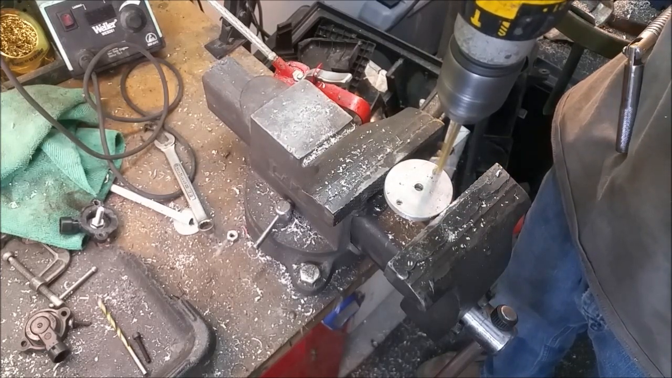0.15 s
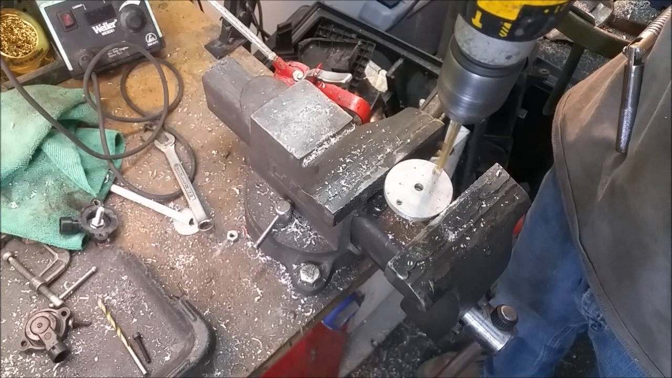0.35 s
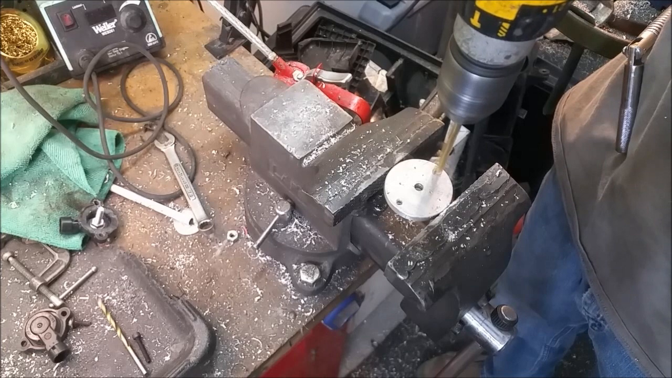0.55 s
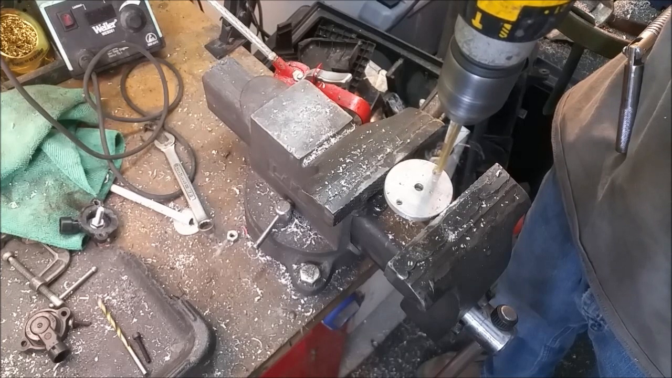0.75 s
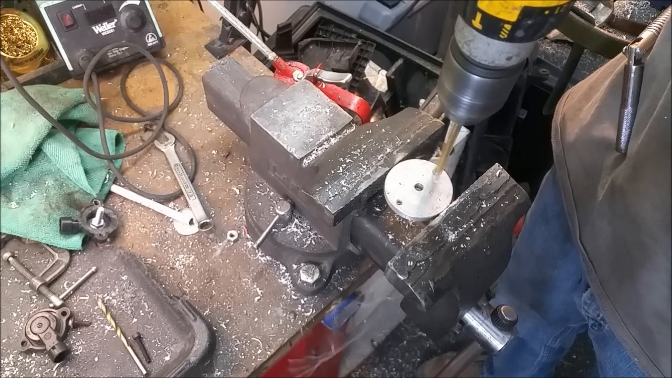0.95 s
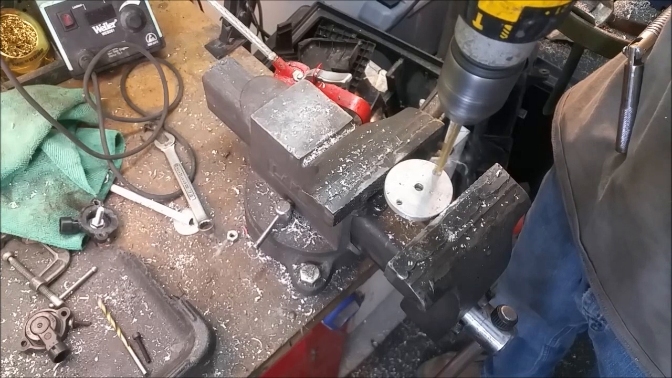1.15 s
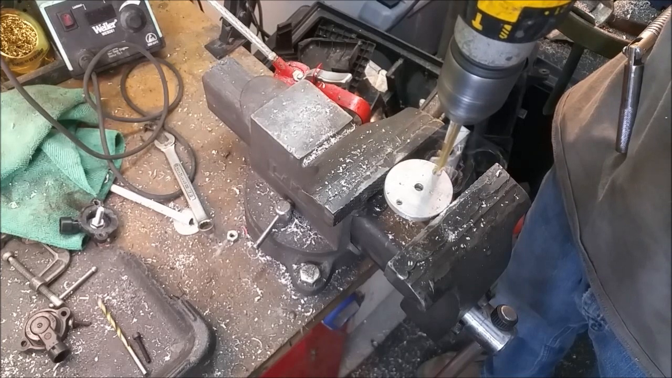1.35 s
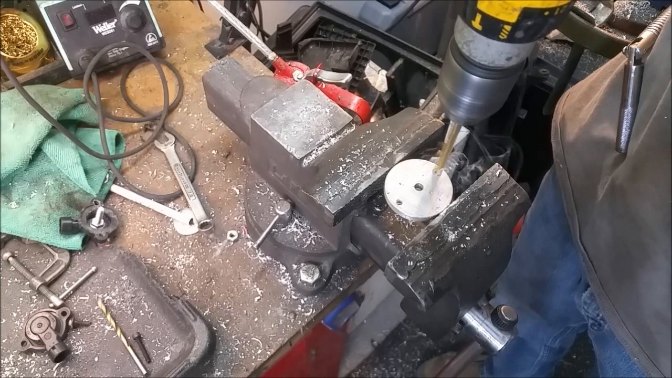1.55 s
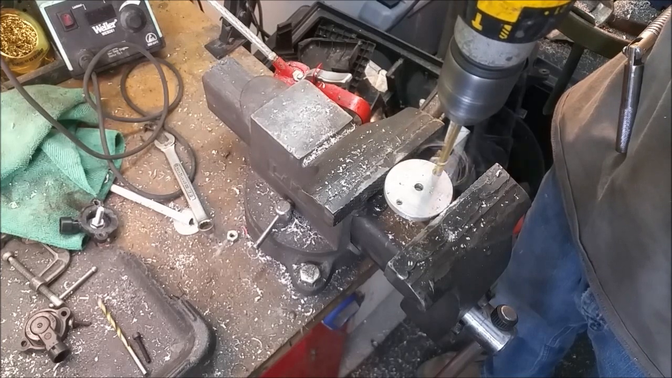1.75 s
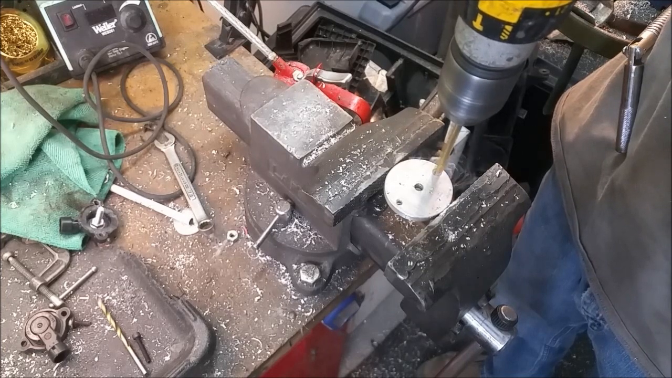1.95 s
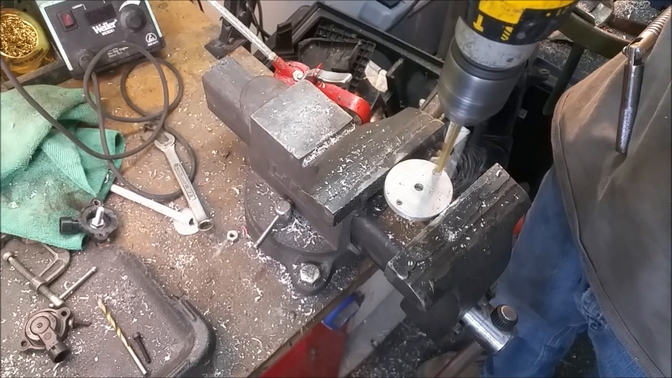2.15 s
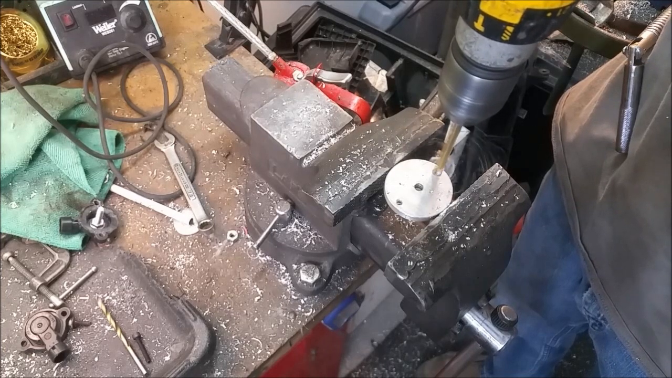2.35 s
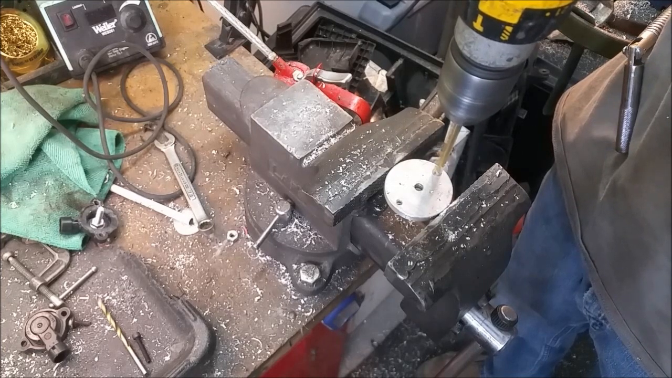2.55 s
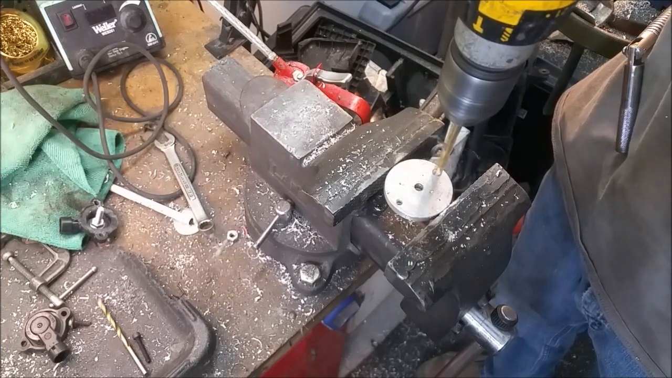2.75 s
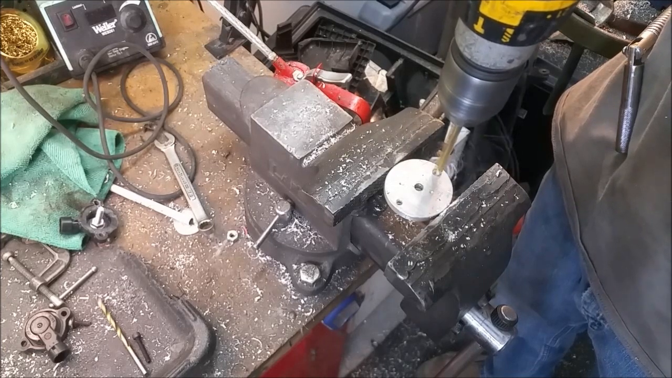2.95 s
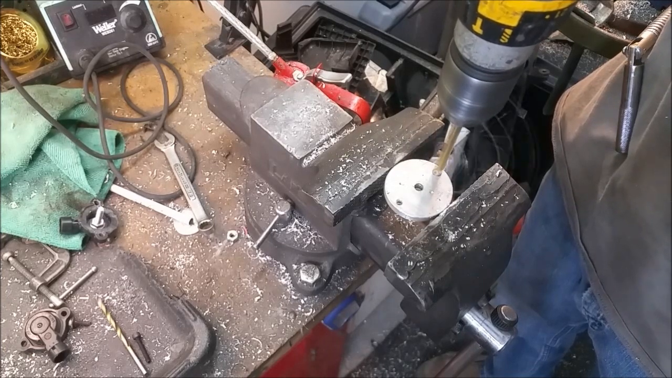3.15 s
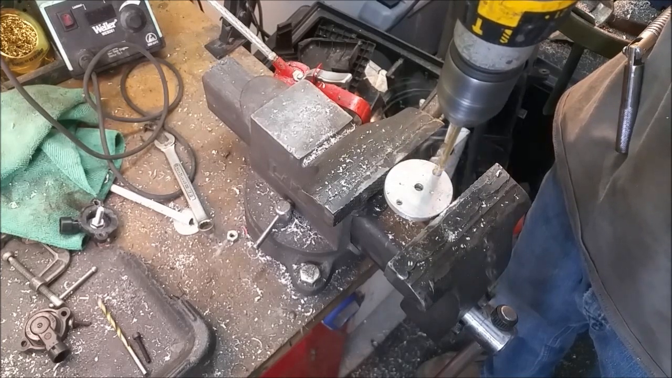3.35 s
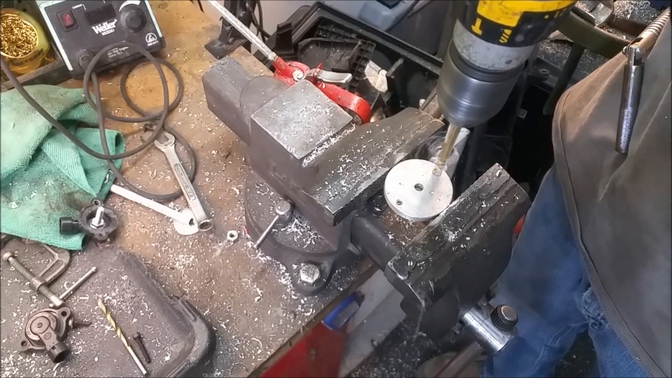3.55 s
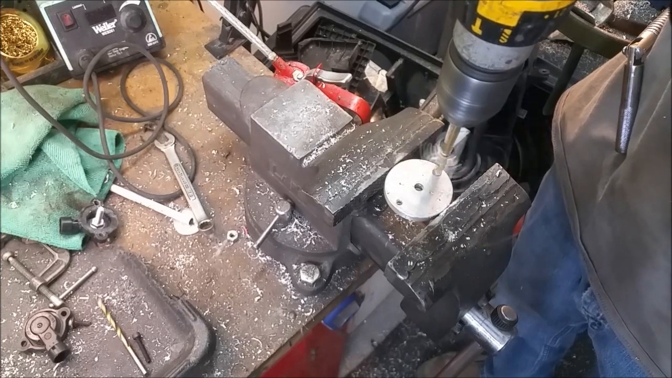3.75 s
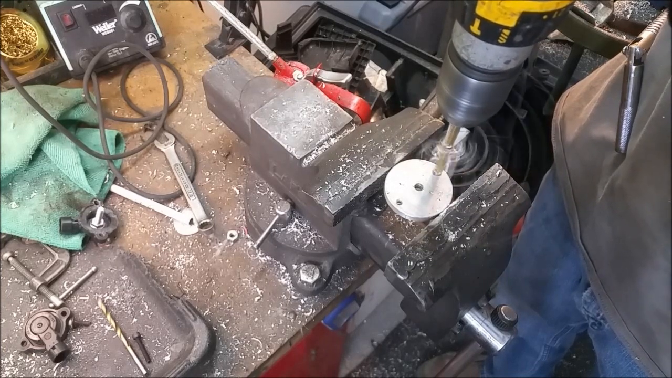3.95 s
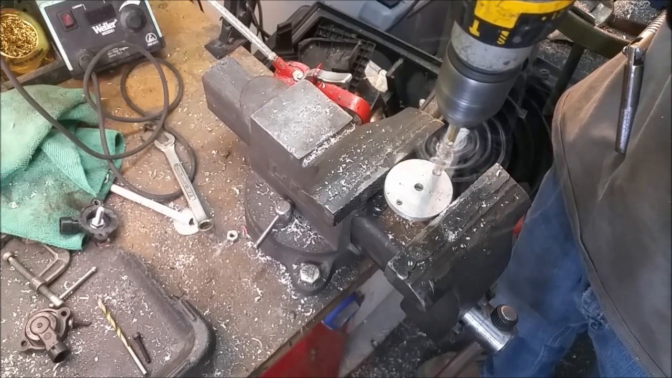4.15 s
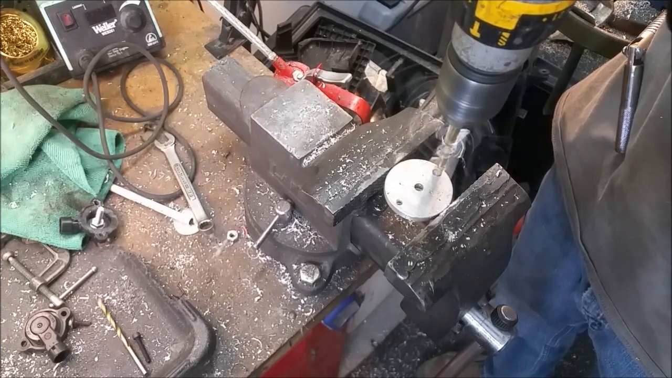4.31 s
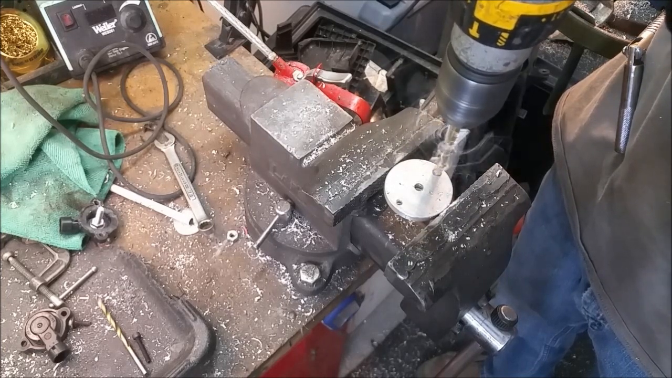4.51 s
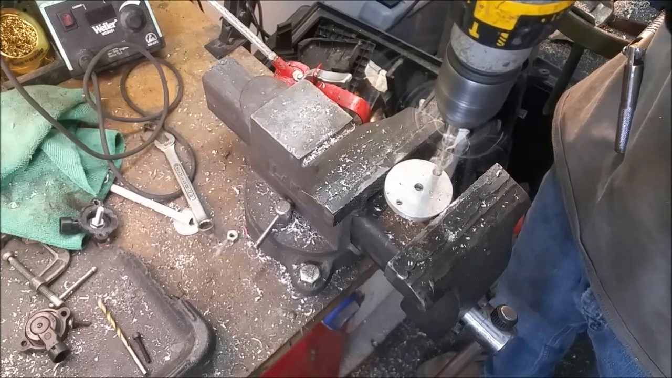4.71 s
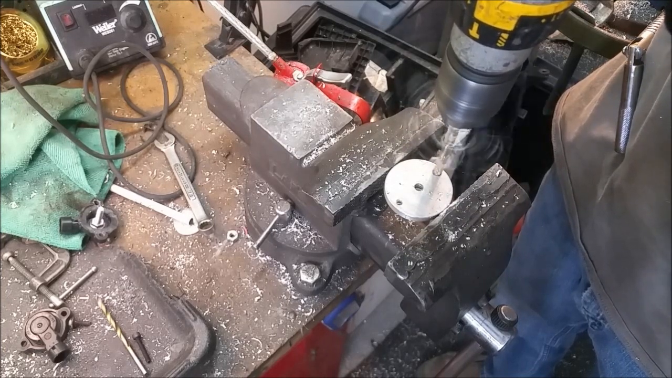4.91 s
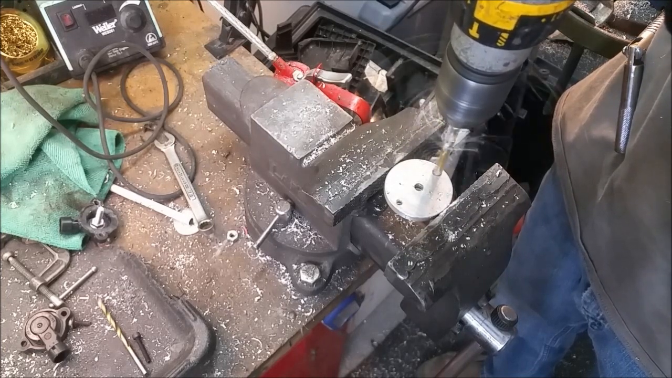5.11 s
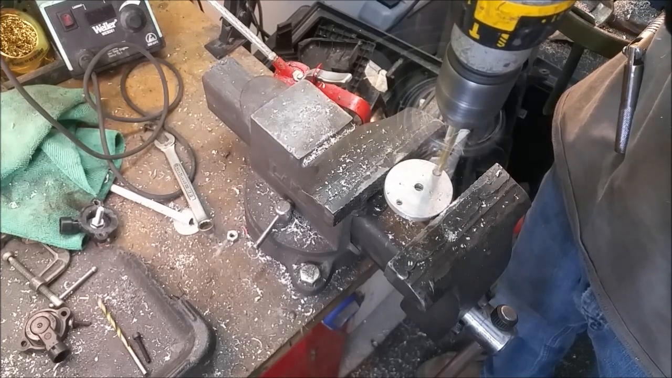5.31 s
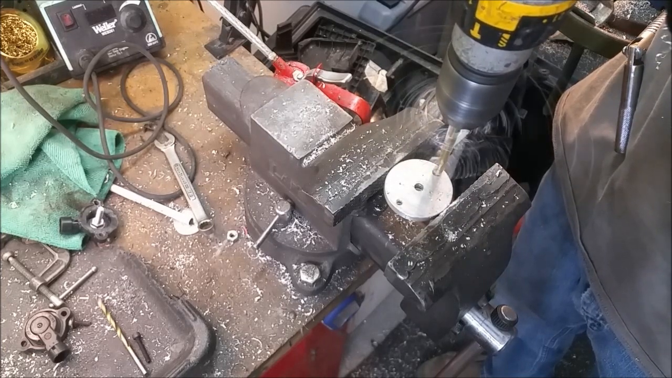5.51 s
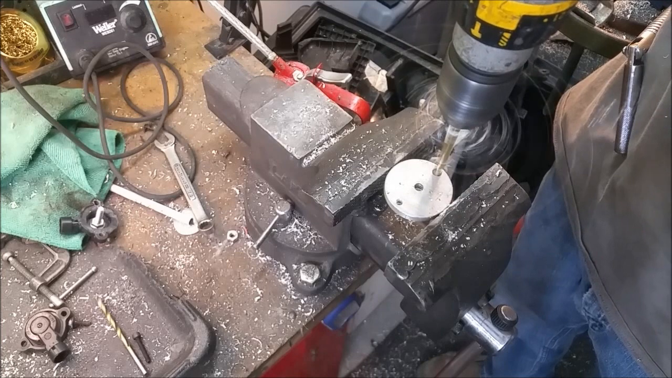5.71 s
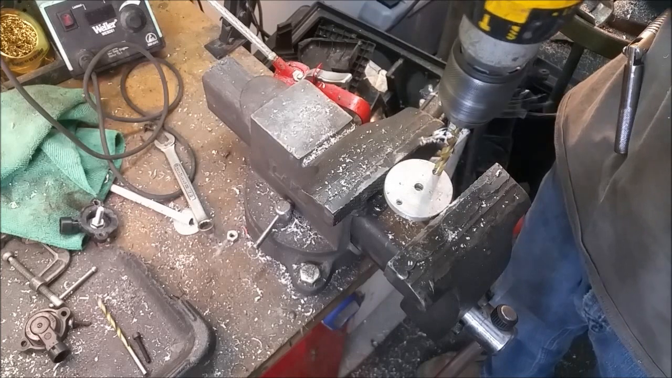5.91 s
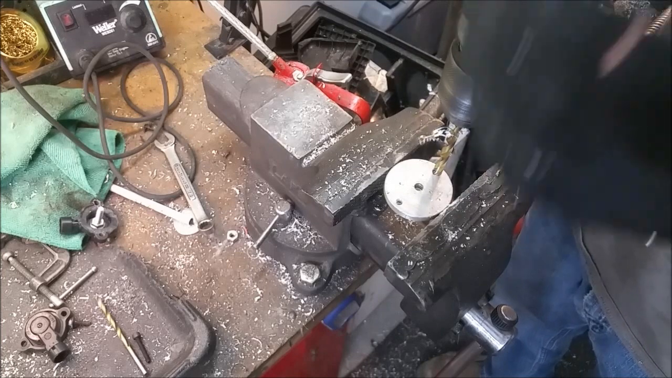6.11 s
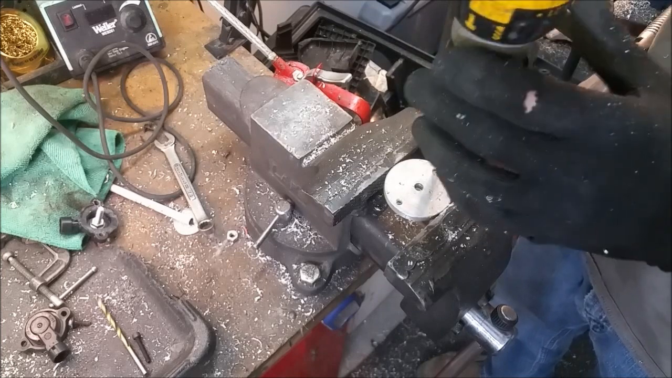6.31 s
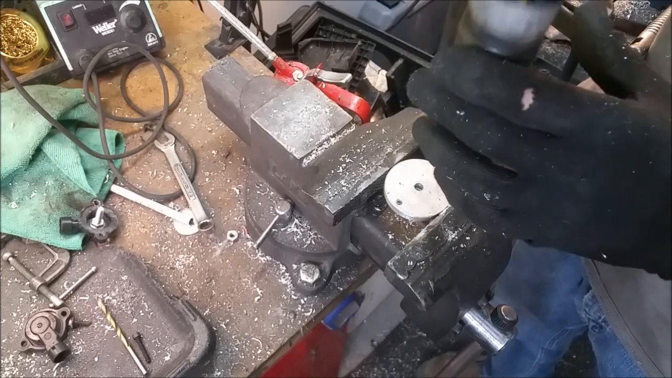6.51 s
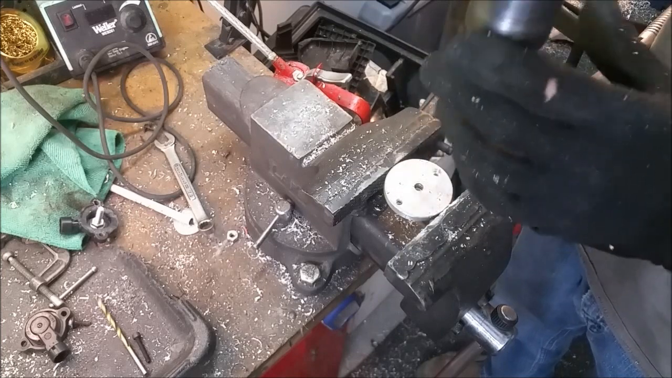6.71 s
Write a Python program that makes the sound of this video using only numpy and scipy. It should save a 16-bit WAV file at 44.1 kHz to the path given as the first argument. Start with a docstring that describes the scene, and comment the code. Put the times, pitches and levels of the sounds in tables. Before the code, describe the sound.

A cordless drill bores into aluminium with a loud, high, warbling squeal, then stops and is blipped once.

```python
"""A cordless drill's bit squeals as it bores a shallow recess in an aluminium disc in a vice.
The squeal is self-excited chatter, which warbles each time a cutting lip comes round. Chips scrape,
the gears whine, air from the motor fan buffets the left microphone, and a low hum swells at times.
The bit squeaks as it is pulled out; the drill brakes with a clack and is blipped once with no load.
The bench and the walls of the small workshop reflect the sound."""
import sys
import numpy as np
from scipy import signal
from scipy.io import wavfile

SR = 44100
rng = np.random.default_rng(int(sys.argv[2]) if len(sys.argv) > 2 else 0)


def unload_audio(sound):
    """Save the sound as a 16-bit wav file, at the path given as the first command line argument."""
    columns = np.transpose(np.atleast_2d(sound))
    # keep every value between -1 and 1, then stretch to whole-number steps
    steps = np.round(np.clip(columns, -1, 1) * 32767)
    wavfile.write(sys.argv[1], SR, steps.astype(np.int16))


N = 298557
TIME = np.arange(N) / SR

# passing frequency of the cutting lips: t/s, f/Hz
LIP_RATE = [(0, 16.679), (.4, 16.138), (.95, 16.219), (1.15, 15.754), (2.15, 15.944), (2.6, 15.414),
            (3, 15.654), (3.45, 15.409), (4.9, 15.669), (5.2, 15.406), (5.85, 16.049)]
# how hard the lips are pressed into the metal: t/s, load (0-1)
LOAD = [(0, 0.44), (1.2, 0.13), (2.1, 0.34), (2.5, 0.82), (3.7, 1), (5.7, 0.77), (5.83, 0)]
# squeal at the microphones: t/s, left minus right/dB, phase lead of the right/rad
SQUEAL_PAN = [(0, 0, 0.05), (1.8, 1, 0.18), (2.4, 1.5, 1), (3.8, 0.5, 0.78), (4.8, -1, 0.41),
              (5.8, -0.5, 0.042)]
# weaker ringing tones of bit and disc, plus a faint sum tone of the squeal and the 6.8 kHz ringing: f/Hz,
# width/Hz, level/dB early, midway and late in the cut, place in the pass (0-1), left minus right/dB
SIDE_TONES = [(2346, 220, -62.5, -49, -52, 0.91, 5.5), (3796, 130, -64, -43, -53, 0.16, -3),
              (3756, 130, -52, -45.5, -52.5, 0.73, -7), (4670, 210, -52.5, -57.5, -51, 0.12, -4.5),
              (6830, 180, -49.5, -49.5, -45, 0.1, -36), (11950, 70, -51, -65, -58.5, .95, -14),
              (12600, 320, -58.5, -56, -52, .05, -7.5)]
# spectrum of the scraping chips: f/Hz, relative level/dB
CHIP_SPECTRUM = [(150, -22.5), (400, -7.5), (700, -5.5), (1100, -5), (1600, 0), (2400, -1), (3100, 0.5),
                 (4000, -3.5), (5200, 8.5), (6400, -1.5), (8300, -16), (10500, -14), (14000, -10.5),
                 (16000, -27.5)]
# coherence of the drill's noise between the microphones: f/Hz, correlation
COHERENCE = [(100, 1), (640, 0.36), (1400, 0.36), (3100, .5), (6000, 0.4), (9000, -0.26), (15000, 0.4)]
# balance of the drill's noise: f/Hz, left minus right/dB
BALANCE = [(200, 10), (700, 1.5), (1300, 0.5), (2400, 3.5), (4400, 1), (6800, -3), (9000, 18.5),
           (12500, -13), (15000, 5.5)]
# motor and gear tones: multiple of the lip rate, relative level/dB at light and at heavy load
GEAR_TONES = [(40.14, -10, -11.5), (64.03, -4.5, -3), (79.8, -10.5, -7.5), (118.6, -9, -2.5),
              (144, -16.5, -5), (155.4, -4.5, -1.5), (162.9, -8, -6.5), (171.2, -12.5, 0.5)]
# spectrum of the fan's draught: f/Hz, relative level/dB
DRAUGHT_SPECTRUM = [(15, -43), (25, -12), (91, 3.5), (200, 0), (227, -1.5), (327, -6.5), (500, -6.5),
                    (650, -7), (1100, -120)]
# spectrum of the room's background noise: f/Hz, relative level/dB
HUSH_SPECTRUM = [(18, -26.5), (30, -2.5), (234, -8), (281, -15), (511, -17.5), (1870, -31), (2560, -28.5),
                 (15000, -43.5)]
# swells of low hum: peak t/s, half length/s, f/Hz, level/dB
HUMS = [(2.52, 0.43, 93.4, -59.5), (3.03, 0.42, 140, -60), (5.95, 0.18, 198, -73.5)]
# squeaks of the bit: t/s, length/s, start f/Hz, middle f/Hz, end f/Hz, level/dB
SQUEAKS = [(5.794, 0.01, 11200, 11300, 10980, -31), (5.83, .018, 11600, 11500, 12300, -34.5)]
# spectrum of the unloaded gears: f/Hz, relative level/dB
RATTLE_SPECTRUM = [(71, -73), (120, -30), (435, -15), (642, -17.5), (820, -6), (1190, -11), (1710, -1.5),
                   (2470, -13), (4040, -2.5), (10400, -19), (11500, -23), (13800, -12), (15900, -29.5)]
# impacts as the brake takes up the gear play: t/s, level/dB
CLACKS = [(5.847, -34), (5.926, -54), (6.576, -30), (6.603, -31.5), (6.614, -41), (6.677, -57)]
# whines of the speed control: t/s, length/s, start f/Hz, middle f/Hz, end f/Hz, level/dB
CONTROL_WHINES = [(6.272, .033, 4700, 4730, 4760, -71), (6.357, .021, 5080, 5050, 4950, -69),
                  (6.376, .062, 4080, 3690, 4500, -46.5)]

SINK_FROM_S, SINK_TO_S, STOP_S = 1.8, 4.5, 5.844  # the bit sinks steadily between the first two
DIG_PLACE, SLIP_PLACE = .035, 0.711  # where in its pass (0-1) a lip digs in and slips
# The recess steadies the chatter and makes it louder. Pairs are (at first touch, at full depth).
SQUEAL_HZ, SWING_HZ, SQUEAL_DB = (5598, 5614), (99.9, 36.3), (-21.5, -20)
RIDE_PLACE, RIDE_SHARPNESS, RIDE_DB = (0.539, 0.36), (12, 1.1), (3, 2.5)  # short surge, then long swell
SLIP_LOSS_DB, GRIP_CAP_DB = (8.5, 3), (5.0, 2.5)
BLIP_ON_S, BLIP_OFF_S, BLIP_LIP_HZ, SPIN_UP_S = 6.381, 6.548, 13.8, 0.039


def from_db(db):
    """Amplitude ratio of a level."""
    return 10 ** (np.asarray(db) / 20)


def rms_one(x):
    """The signal at unit rms."""
    return x / np.sqrt(np.mean(x ** 2) + 1e-20)


def in_time(rows):
    """Each column of a curve, sample by sample."""
    s, *columns = np.transpose(rows)
    return [np.interp(TIME, s, c) for c in columns]


def at_hz(points, hz):
    """A spectrum interpolated on a log-frequency axis."""
    frequencies, values = np.transpose(points)
    return np.interp(np.log(hz), np.log(frequencies), values)


def since(s):
    """Time elapsed after an instant, zero before it."""
    return np.maximum(TIME - s, 0)


def ramp(from_s, to_s):
    """A linear rise from 0 to 1."""
    return np.clip((TIME - from_s) / (to_s - from_s), 0, 1)


def swell(peak_s, half_s):
    """A Gaussian envelope of height 1."""
    return np.exp(-((TIME - peak_s) / half_s) ** 2)


def between(ends, share):
    """Linear interpolation between two values."""
    return ends[0] + share * (ends[1] - ends[0])


def bump(angle, place, sharpness):
    """A periodic pulse of height 1, once in each pass of a lip."""
    return np.exp(sharpness * (np.cos(angle - 2 * np.pi * place) - 1))


def pan(db):
    """Left and right gains, mean 1, for a level difference."""
    gains = from_db(np.array([[1], [-1]]) * db / 2)
    return gains / gains.mean(axis=0)


def drift(hz):
    """A low-pass random fluctuation of unit rms."""
    pole = np.exp(-20 * np.pi * hz / SR)
    slow = signal.lfilter([1], [1, -2 * pole, pole * pole], rng.standard_normal(N // 10 + 4002))[4000:]
    return np.interp(np.arange(N) / 10, np.arange(len(slow)), rms_one(slow))


def angle_of(hz):
    """Phase as the integral of frequency."""
    return 2 * np.pi * np.cumsum(hz) / SR


def coloured(spectrum, grain_db, coherence=COHERENCE, balance=BALANCE):
    """Partly coherent stereo noise in third octaves, roughened by a common modulation; unit rms."""
    out, edges = 0, 25 * 2 ** (np.arange(29) / 3)
    white = rng.standard_normal((2, 2, N)) * from_db(grain_db * drift(220))
    for k, (low, high) in enumerate(zip(edges, edges[1:])):
        band = signal.butter(2, [low, high], "band", fs=SR, output="sos")
        mid, side = signal.sosfilt(band, white[k % 2])
        hz = np.sqrt(low * high)
        alike = np.clip(at_hz(coherence, hz), -1, 1)
        pair = mid + np.sqrt((1 - alike) / (1 + alike + 1e-9)) * side * [[1], [-1]]
        out = out + from_db(at_hz(spectrum, hz)) * pan(at_hz(balance, hz)) * pair
    return out / np.std(out.mean(axis=0))


def wavering(hz, flutter, octave_db):
    """A tone under random frequency modulation, with its octave where that does not alias."""
    phase = angle_of(hz * (1 + flutter * drift(180)))
    return np.sqrt(2) * (np.sin(phase) + from_db(octave_db) * (hz < SR / 4) * np.sin(2 * phase))


def chirps(rows, edge_s, flutter, octave_db):
    """Short tones, each gliding along a parabola through three frequencies."""
    out = 0
    for s, length_s, *pitches, db in rows:
        hz = np.polyval(np.polyfit([0, .5, 1], pitches, 2), ramp(s, s + length_s))
        gate = ramp(s, s + edge_s) * (1 - ramp(s + length_s - edge_s, s + length_s))
        out = out + from_db(db) * gate * wavering(hz, flutter, octave_db)
    return out


def snags(lip, rise_s=0.002155):
    """Stick-slip catches (0-1) build up and let go: a chip snaps once a pass, others come at random."""
    passes = np.floor(lip / (2 * np.pi) - .3 + 0.014 * drift(8))
    snaps = np.diff(passes, prepend=passes[0]) > 0
    catches_per_s = 85 * (.12 + bump(lip, place=.74, sharpness=3.5))  # most while the lip slips
    catches = rng.random(N) < catches_per_s / SR
    sizes = (snaps | catches) * rng.uniform(0.58, 1, N)
    t = np.arange(-400, 401) / SR
    shape = np.exp(-(t / np.where(t < 0, rise_s, 0.22 * rise_s)) ** 2)
    return np.clip(signal.fftconvolve(sizes, shape, "same"), 0, 1)


def squeal(lip, depth, cutting, snag, ring_hz=5670, decay_db_per_s=327):
    """Self-excited chatter: the bit's stiffness varies with each lip, modulating the frequency."""
    # a lip digs in at high pitch, rides loudest as the pitch sags, then slips
    dig = (0.15 + .9 * depth) * bump(lip, DIG_PLACE, sharpness=2.5)
    sag = bump(lip, place=0.443, sharpness=4.3) + .8 * bump(lip, place=0.616, sharpness=12)
    bend = .5 - 1.7 * sag + dig - 1.1 * depth * bump(lip, SLIP_PLACE, sharpness=5.2)
    ride = bump(lip, between(RIDE_PLACE, depth), between(RIDE_SHARPNESS, depth))
    slip = bump(lip, SLIP_PLACE, sharpness=5.0)
    # torque ripple from the gears shakes the pitch; while shallow the bit also rocks four times a pass
    ripple = np.sin(8 * lip + 1.3 * drift(25))
    rocking = (1 - depth) * np.cos(4 * lip - 2 + .7 * drift(8))
    shake = 0.22 * ripple + .15 * rocking + 0.131 * drift(44.4)
    jitter = (0.23 + .5 * slip) * drift(330) + 1.85 * snag * drift(100)
    skating = swell(0, half_s=.7)  # on the surface the bit is a little sharper and louder
    hz = between(SQUEAL_HZ, depth) + 24.97 * skating + between(SWING_HZ, depth) * (bend + shake + jitter)
    free_hz = ring_hz * (1 + 0.014 * drift(90))
    phase = angle_of(between((free_hz, hz), cutting))
    # while a lip slips, the tone stutters, by a different amount in each pass
    stutter = 1 + np.sin(angle_of(90 + 25 * drift(28)))
    slip_db = between(SLIP_LOSS_DB, depth ** 2) * slip * from_db(2.8 * drift(11))
    surge_db = between(RIDE_DB, depth) * ride + .5 * ripple + 1.06 * rocking + 1.19 * drift(30)
    loss_db = (.5 + slip_db) * stutter + (12 - 4 * depth) * snag
    grip_db = -np.logaddexp(loss_db - surge_db, -between(GRIP_CAP_DB, depth))  # friction caps the swing
    level = from_db(between(SQUEAL_DB, depth) + 1.3 * skating + grip_db * cutting)
    ring_out = np.maximum(cutting, from_db(-decay_db_per_s * since(STOP_S)))  # free decay on release
    pan_db, lead = in_time(SQUEAL_PAN)
    tone = ring_out * np.sin(phase + lead / 2 * np.array([[-1], [1]])) * pan(pan_db)
    octave = from_db(-23.3) * cutting * np.sin(2 * phase) * pan(22.0)
    return np.sqrt(2) * level * (tone + octave)


def side_tones(lip):
    """Friction sets bit and disc ringing on each pass; a faint sum tone of the squeal and the 6.8 kHz ringing
    joins in."""
    out = 0
    for hz, width_hz, *levels_db, place, pan_db in SIDE_TONES:
        phase = angle_of(hz * (1 + .006 * drift(12)))
        ringing = drift(width_hz) * np.sin(phase) + drift(width_hz) * np.cos(phase)
        level = from_db(np.interp(TIME, [.4, 2.5, 4.8], levels_db))
        rubbing = bump(lip, place, sharpness=2.3) * from_db(2.3 * drift(4.0))
        out = out + level * rms_one(ringing * rubbing) * pan(pan_db)
    return out


def chips(lip, load, snag):
    """Tearing metal radiates broadband noise, most under load, as a lip digs in and as a chip snaps."""
    bite_db = 0.81 * np.cos(lip + 0.29) + 0.9 * snag
    return from_db(-39 + 3.5 * load + bite_db) * coloured(CHIP_SPECTRUM, grain_db=1.9)


def gears(lip_hz, load, flutter):
    """Periodic meshing gives tones locked to the motor speed; upper ones are rougher, rising with load."""
    turn = angle_of(lip_hz * (1 + flutter * drift(26)))
    out = 0
    for order, *levels_db in GEAR_TONES:
        jitter = np.interp(order, [70, 150], [.18, .7]) * drift(43.2)
        level = from_db(between(levels_db, load) + 1.3 * drift(40))
        out = out + level * np.sin(order * turn + jitter)
    return np.sqrt(2) * out


def draught(grazing_db=-57, direct_db=-49, turn_s=4.38):
    """Turbulent fan air grazes the left microphone, turns onto it, and dies with a puff at the stop."""
    db = between((grazing_db, direct_db), ramp(turn_s - .05, turn_s + 0.017))
    db = db + 3 * swell(STOP_S, half_s=0.0497) + 0.82 * drift(16.6)
    air = coloured(DRAUGHT_SPECTRUM, grain_db=1.0, coherence=[(50, .1), (400, .1)],
                   balance=[(60, 18), (200, 16), (500, 14.0)])
    return from_db(db) * np.exp(-since(STOP_S) / 0.021) * air


def room_hush():
    """Stationary background noise, strongest in the bass."""
    return from_db(-75) * coloured(HUSH_SPECTRUM, grain_db=-1.5, balance=[(100, 0), (10000, 0)])


def low_hum():
    """Low tones, broadened by frequency modulation, swell and fade on the left."""
    return pan(14.0) * sum(from_db(db) * swell(s, half_s) * wavering(hz, flutter=0.0845, octave_db=-13.5)
                           for s, half_s, hz, db in HUMS)


def withdrawal_squeaks():
    """Sliding friction makes the bit squeak as it is pulled out."""
    return chirps(SQUEAKS, edge_s=0.00395, flutter=0.0054, octave_db=-60)


def braked(lip_hz, off_s, brake_hz_per_s=165):
    """Uniform deceleration to rest once the trigger is let go."""
    return np.maximum(lip_hz - brake_hz_per_s * since(off_s), 0)


def free_gears(lip_hz):
    """Unloaded gears rattle and whine in the run-down and the blip; amplitude is a power law of speed."""
    run_down = braked(lip_hz, STOP_S + 0.016)
    spin_up = BLIP_LIP_HZ * (1 - np.exp(-since(BLIP_ON_S) / SPIN_UP_S)) ** 2
    blip = braked(spin_up, BLIP_OFF_S)
    speed = run_down + blip
    noise = coloured(RATTLE_SPECTRUM, grain_db=1.0, balance=[(300, -1.1), (3000, -1.3), (12000, -1.9)])
    rattle = from_db(np.where(blip > 0, -37.5, -46.5)) * noise
    whine = from_db(-51) * gears(speed, load=0.53, flutter=0.0058)
    return (speed / BLIP_LIP_HZ) ** 0.69 * (rattle + whine)


def brake_clacks(decay_s=0.0067):
    """Impacts give short bursts of noise as the brake takes up the backlash of the gears."""
    knocks = sum(from_db(db) * ramp(s - .0015, s + .0005) * np.exp(-np.abs(TIME - s) / decay_s)
                 for s, db in CLACKS)
    noise = coloured([(100, -23.5), (350, -3), (1300, 6), (2500, 0), (5000, -2.5), (9000, -14.5),
                      (15000, -21.0)], grain_db=2.0)
    return signal.sosfilt(signal.butter(2, 250, "high", fs=SR, output="sos"), knocks * noise)


def speed_control():
    """The speed control sings in brief frequency glides as the trigger is squeezed."""
    return chirps(CONTROL_WHINES, edge_s=.003, flutter=0.013, octave_db=-20)


def bench(x, delays_ms=(6.07, 8.73), echo_db=-11.0):
    """Interference: the bench's reflection, delayed differently left and right, beats with glides."""
    echo = [np.interp(TIME - ms / 1000, TIME, channel, left=0) for ms, channel in zip(delays_ms, x)]
    return x + from_db(echo_db) * np.array(echo)


def workshop(x, wet_db, t60_s=0.4, treble_t60_s=0.24):
    """Diffuse reverberation decays exponentially, the treble first, and differs at each microphone."""
    t = TIME[:SR // 2]
    noise = rng.standard_normal((2, len(t))) * (t > .004)
    body = signal.sosfiltfilt(signal.butter(4, 7500, fs=SR, output="sos"), noise)
    tail = body * from_db(-60 * t / t60_s) + 1.74 * (noise - body) * from_db(-60 * t / treble_t60_s)
    tail /= np.sqrt(np.sum(tail ** 2, axis=1, keepdims=True))
    return x + from_db(wet_db) * signal.fftconvolve(x, tail, axes=1)[:, :N]


def scene():
    """Superposition: the drill with its reverberation, and draught, hum and hush without."""
    lip_hz, = in_time(LIP_RATE)
    load = np.clip(in_time(LOAD)[0], 0, 1)
    depth = ramp(SINK_FROM_S, SINK_TO_S)
    lip = angle_of(lip_hz) + 2 * np.pi * .04  # one cycle for each pass of a lip
    cutting = np.exp(-since(STOP_S) / 0.005)
    snag = snags(lip)
    scrape = cutting * chips(lip, load, snag)
    whine_db = between((-56.5, -51), ramp(0, 1.23))  # comes up as the cut begins
    whine = from_db(whine_db) * cutting * gears(lip_hz, load, flutter=0.00088) * pan(1.2)
    hum = low_hum()
    squeaks = withdrawal_squeaks()
    hush = room_hush()
    chatter = bench(squeal(lip, depth, cutting, snag))
    tones = workshop(chatter + whine + squeaks, wet_db=-12.0)
    ringing = cutting * side_tones(lip)
    unloaded = speed_control() + (1 - cutting) * free_gears(lip_hz) + brake_clacks()
    noises = workshop(scrape + ringing + unloaded, wet_db=-7)
    return tones + noises + draught() + hum + hush


def record(dry):
    """Band limiting: a steep low-pass filter cuts off above 15.9 kHz."""
    return signal.sosfilt(signal.ellip(12, .1, 80, 15900, fs=SR, output="sos"), dry)


dry = scene()
out = record(dry)
unload_audio(out)
```